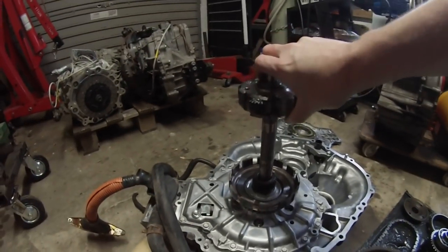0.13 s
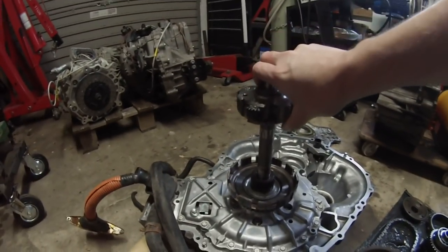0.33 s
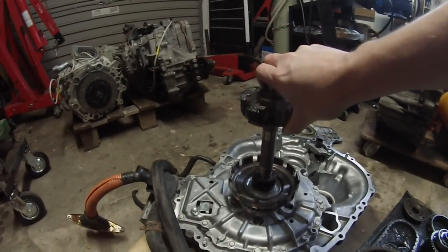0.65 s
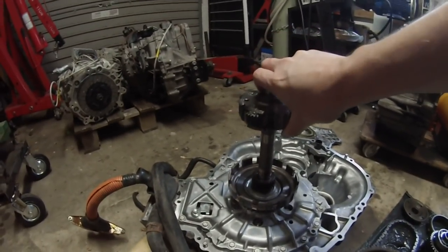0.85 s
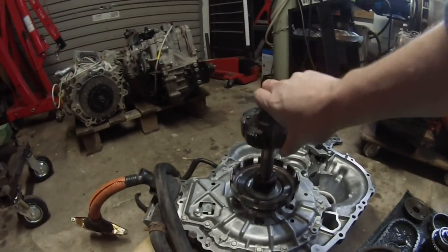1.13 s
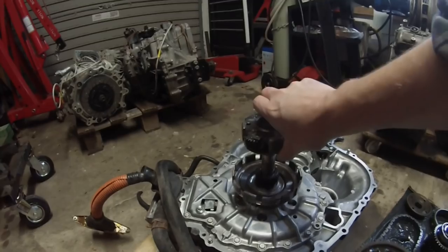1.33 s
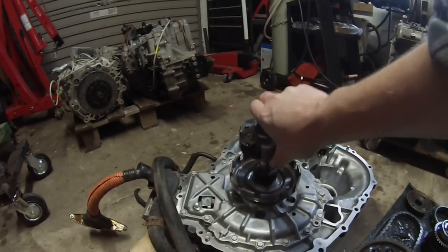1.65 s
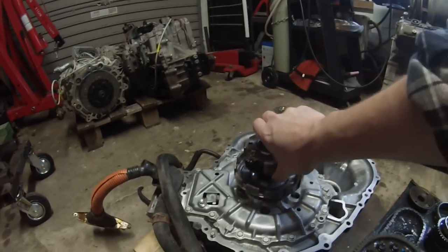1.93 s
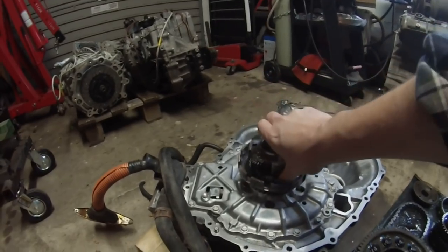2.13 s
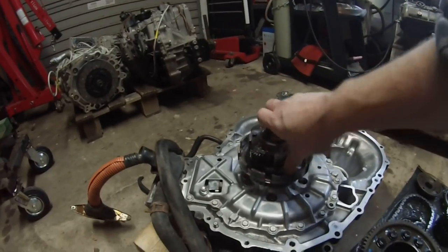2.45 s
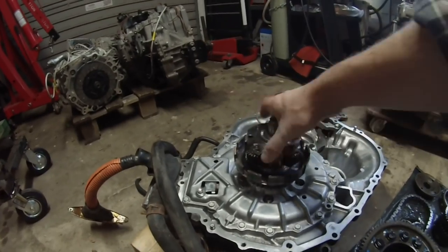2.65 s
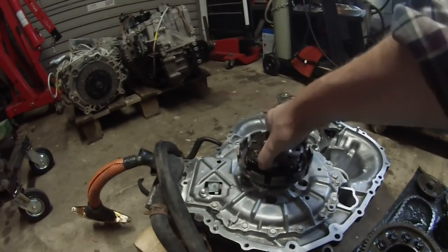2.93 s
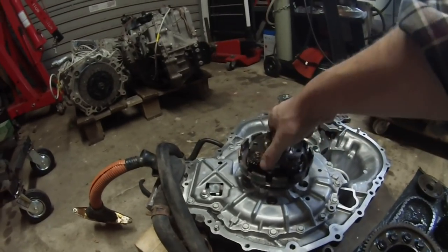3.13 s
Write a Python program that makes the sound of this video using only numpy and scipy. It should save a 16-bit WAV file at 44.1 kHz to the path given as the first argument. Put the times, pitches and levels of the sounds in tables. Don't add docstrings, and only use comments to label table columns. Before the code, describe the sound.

Heavy steel gear shaft clinks and knocks into a metal case, ending with two loud clacks

```python
import sys
import numpy as np
from scipy import signal
from scipy.fft import rfft, irfft
from scipy.io import wavfile
from scipy.ndimage import uniform_filter1d

SR = 44100
rng = np.random.default_rng(int(sys.argv[2]) if len(sys.argv) > 2 else 0)


def dump(signal):
    limited = np.clip(np.atleast_2d(signal).T, -1, 1)
    pcm = np.round(limited * 32767).astype(np.int16)
    wavfile.write(sys.argv[1], SR, pcm)


def invert_db(x):
    u = np.asarray(x, float) / 20
    return 10 ** u


N = 145530
LEAD_S = 0.5
LAYER_SIZE = N + 2 * SR
MODE_SPREAD_DB = 2


def at_hz(points, hz):
    table_hz, values = np.transpose(points)
    return np.interp(np.log(hz), np.log(table_hz), values)


def add(out, s, sound):
    i = int((s + LEAD_S) * SR)
    out[i:i + len(sound)] += sound


def smooth_rise(progress):
    return np.sin(np.pi / 2 * np.minimum(progress, 1)) ** 2


def rings(hz, db, t60, seconds=.6):
    t = np.arange(int(seconds * SR))[:, None] / SR
    signs = (-1.) ** np.arange(len(hz))
    return np.sum(signs * invert_db(db - 60 * t / t60) * np.sin(2 * np.pi * hz * t), axis=1)


def shaft():
    # t/s, level/dB, third mode/dB, lowest mode/dB, free ring re burst/dB
    clinks = [(0.1272, -41, -17, -0.5, -7.5), (.203, -63.5, -23, 4, 6), (.3167, -59.5, 7.5, -11, -24),
              (0.374, -63, 8.5, 15, -5), (0.395, -43, 1.5, 1, -7), (1.268, -33.5, -4, -8, -6.5),
              (1.2741, -33.5, 7.5, -12, -19), (1.603, -63, -15, -19, -14), (1.6317, -50, -4.5, -20, -17),
              (1.7834, -70, -9, -5, 0), (1.8122, -36.5, -16, 1, -12), (1.8462, -28.5, 0, -10, -40),
              (2.029, -51, -0.5, 11, -2), (2.588, -56, 1, -5, -23), (2.8159, -11.5, -20, -10, -31),
              (2.9725, -24, 3.5, -27, -1.5)]
    # f/Hz, level/dB, free ring T60/s
    bending_modes = [(1033, -2.5, 0.24), (2255, 5, 0.2), (3538, 0, 0.1), (4880, -3, 0.074),
                     (6150, 2.5, 0.065), (6960, -25, 0.056)]
    grip_t60_s, rise_s = 0.015, 0.0008
    seated_s, seated_t60_share, seated_top_db = 1.2, 0.3, 6.5
    out = np.zeros(LAYER_SIZE)
    hz, db, t60 = np.transpose(bending_modes)
    luck_db = rng.normal(0, 1, (len(clinks), len(hz)))
    for (s, level_db, third_db, low_db, ring_db), chance_db in zip(clinks, luck_db):
        seated = s > seated_s
        upper_db = -1.6 * abs(third_db) - seated_top_db * seated
        balance_db = np.r_[low_db, 0, third_db, np.full(len(hz) - 3, upper_db)]
        mode_db = level_db + db + balance_db + chance_db
        choked = rings(hz, mode_db, grip_t60_s)
        free = rings(hz * 1.002, mode_db + ring_db, t60 * (seated_t60_share if seated else 1))
        sound = choked + free
        add(out, s, sound * smooth_rise(np.arange(len(sound)) / (rise_s * SR)))
    return out


def singled():
    # t/s, f/Hz, level/dB, T60/s
    single_modes = [(.128, 1051, -52, 0.47), (.3175, 3500, -61, .03), (.3175, 6800, -54, .02),
                    (.396, 2248, -46.5, 0.22), (.396, 3610, -58, 0.26), (.396, 6160, -62, 0.25),
                    (.395, 2900, -52, 0.023), (.652, 518.4, -48, 0.17), (1.275, 2650, -30, 0.024),
                    (1.277, 926, -36, .1), (1.277, 299.2, -35, 0.32), (1.29, 62, -52, 0.61),
                    (1.3, 111, -47.5, 0.42), (1.783, 2030, -51, 0.088), (1.783, 3400, -59, .04),
                    (1.799, 2150, -47, 0.055), (1.81, 219, -38.5, 0.3), (1.81, 796, -41, 0.14),
                    (1.833, 1720, -49, .02), (1.846, 3540, -48, .2), (1.846, 3100, -45, 0.023),
                    (1.846, 6170, -39, 0.017), (2.028, 1730, -43, 0.016), (2.066, 2290, -54, .04),
                    (2.07, 530, -37.5, 0.36), (2.072, 815, -38, 0.12), (2.199, 780, -49, 0.12),
                    (2.224, 811.5, -25, 0.14), (2.224, 685, -41, 0.11), (2.227, 5930, -34, .015),
                    (2.816, 4850, -25, 0.015), (2.816, 6130, -29.5, .012), (2.82, 2277, -23, 0.096),
                    (2.822, 2095, -30, .12), (2.828, 5780, -30, 0.017), (2.828, 5200, -34, 0.017),
                    (2.972, 5710, -20, .012), (2.972, 3490, -17.5, 0.061), (2.975, 778, -19.5, 0.12),
                    (2.974, 1308, -17, .065), (2.974, 1680, -14, 0.066), (2.983, 960, -30, 0.023),
                    (3.0, 60, -52, 0.67)]
    swell_cycles = 3.3
    out = np.zeros(LAYER_SIZE)
    t = np.arange(int(.6 * SR)) / SR
    for s, hz, db, t60 in single_modes:
        decay = invert_db(db - 60 * t / t60)
        add(out, s, smooth_rise(t * hz / swell_cycles) * decay * np.sin(2 * np.pi * hz * t))
    return out


def case():
    # t/s, then level/dB of the deepest, deep, middle and upper mode families
    blows = [(-.03, -55, -57, -62, -72), (.128, -57, -55, -52, -57.5), (.201, -74, -61, -57, -60),
             (0.318, -57, -59, -56.5, -58), (0.374, -51.5, -56.5, -48.5, -53.5), (.435, -52, -58, -54, -55),
             (.652, -58, -49, -44, -45), (.686, -66, -56, -53, -55), (.772, -56, -57.5, -68, -58),
             (.971, -46, -51, -57, -60), (1.156, -66, -81, -76, -81), (1.2766, -31.5, -26.5, -55, -30),
             (1.62, -54, -60, -54, -49.5), (1.6436, -44.5, -59, -48.5, -39), (1.8097, -32, -40.5, -41, -38),
             (1.8212, -39, -41.5, -42, -36), (1.87, -40, -51, -41.5, -61), (2.0279, -38.5, -46, -37, -42),
             (2.0658, -44, -49, -45, -38), (2.105, -49.5, -70, -42.5, -48),
             (2.2237, -32.5, -36.5, -29, -24), (2.585, -58.5, -79, -62, -72),
             (2.819, -29, -28.5, -28.5, -27.5), (2.974, -26, -28, -35, -19.5)]
    # f/Hz, level/dB, T60/s, family [rounded: 0 deepest .. 3 upper
    low_modes = [(109.6, -16.5, 0.37, 0.5), (134.2, -12.5, 0.26, 0), (220.2, 1, 0.15, -0.5),
                 (255.2, 1, 0.1, 0.5), (305.1, -1, 0.22, 1), (415.6, 3.5, 0.04, 2), (64, -30, 0.54, -4),
                 (507.8, 1.5, 0.089, 2), (542, -1, 0.096, 2), (606, 0, 0.061, 2), (679, -10.5, 0.12, 3),
                 (766, 0.5, 0.042, 3), (815.5, -1, 0.087, 3), (948, -14.5, 0.05, 3)]
    swell_cycles = 2.21
    out = np.zeros(LAYER_SIZE)
    hz, db, t60, family = np.transpose(low_modes)
    family = np.round(family).astype(int)
    t = np.arange(int(.6 * SR))[:, None] / SR
    luck = rng.normal(0, 1, (len(blows), 2, len(hz)))
    for (s, *family_db), (chance, phase) in zip(blows, luck):
        mode_db = np.array(family_db)[family] + db + MODE_SPREAD_DB * chance
        decay = invert_db(mode_db - 60 * t / t60)
        waves = smooth_rise(t * hz / swell_cycles) * decay * np.sin(2 * np.pi * (hz * t + phase))
        add(out, s, np.sum(waves, axis=1))
    return out


def colour_db(hz, centre_hz, fall_db):
    rise_db, bend_db = 1.5, 0.37
    octaves = np.log2(hz / centre_hz)
    hump_db = np.where(octaves > 0, -fall_db * octaves - bend_db * octaves ** 2, rise_db * octaves)
    top_loss_db = 26.0 * np.maximum(np.log2(hz / 9500), 0)
    low_loss_db = 9.6 * np.maximum(np.log2(255 / hz), 0)
    return hump_db - top_loss_db - low_loss_db


def clatter():
    # t/s, level/dB, centre f/Hz, fall above centre/(dB per octave), T60/s
    contacts = [(-.03, -45.5, 1710, 9, 0.041), (.1276, -46.5, 2000, 9, 0.014),
                (.3167, -53.5, 6600, 22, 0.034), (.373, -49.5, 800, 9, 0.11),
                (.394, -47.5, 3080, 5.5, 0.07), (.652, -41.5, 850, 13, 0.045),
                (1.0186, -44, 1200, 34, 0.014), (1.267, -44, 3030, 20, 0.077),
                (1.2745, -22.5, 1000, 11, 0.074), (1.6317, -55, 2480, 14, 0.04),
                (1.6442, -37, 1600, 18, 0.017), (1.8095, -40.5, 1200, 11, 0.013),
                (1.8213, -30, 1610, 18, 0.0081), (1.8457, -41, 6000, 39, 0.019),
                (2.0278, -32.5, 1600, 28, 0.021), (2.0657, -48, 824, 7, 0.15),
                (2.2223, -18, 1200, 9, 0.033), (2.586, -51.5, 2000, 9, .03),
                (2.8158, -21, 2480, 7.5, 0.028), (2.972, -9, 1450, 8, 0.04)]
    # f/Hz, level/dB, T60/s
    rim_modes = [(1200, -5, 0.12), (1328, -8.5, 0.044), (1411, -3, 0.074), (1557, 7.5, 0.024),
                 (1695, 3.5, 0.038), (1856, 0.5, 0.087), (2046, 7, 0.04), (2545, -20, 0.047),
                 (3120, 5, 0.049), (3380, -30, 0.023)]
    rim_db, rim_delay_s, rim_rise_s = -9.5, 0.00053, 0.0041
    size = 6000
    out = np.zeros(LAYER_SIZE)
    hz, db, t60 = np.transpose(rim_modes)
    noise = rng.standard_normal((len(contacts), size))
    luck = rng.normal(0, 1, (len(contacts), len(hz)))
    t, bins_hz = np.arange(size) / SR, np.fft.rfftfreq(size, 1 / SR) + 1
    for k, (s, level_db, centre_hz, fall_db, decay_s) in enumerate(contacts):
        envelope = invert_db(-60 * t / decay_s) * np.minimum(t / 0.0006, 1)
        spectrum = rfft(noise[k] * envelope)
        spectrum = spectrum / np.sqrt(uniform_filter1d(np.abs(spectrum) ** 2, size=30))
        burst = irfft(spectrum * invert_db(colour_db(bins_hz, centre_hz, fall_db)), size)
        burst = burst * np.minimum(t / 0.00026, 1) * (t < .1)
        add(out, s, invert_db(level_db) * burst * envelope.std() / burst.std())
        mode_db = level_db + rim_db + db + colour_db(hz, centre_hz, fall_db) + MODE_SPREAD_DB * luck[k]
        rim = rings(hz, mode_db, t60, seconds=.2)
        add(out, s + rim_delay_s, rim * np.minimum(np.arange(len(rim)) / (rim_rise_s * SR), 1))
    return out


def scrape():
    # start t/s, length/s, level/dB
    slides = [
        (1.06, 0.047, -64),
        (1.167, 0.1, -62),
        (1.622, 0.11, -68.5),
        (1.777, 0.105, -61),
        (2.195, 0.026, -60.5),
    ]
    # f/Hz, level/dB
    friction_colour = [(700, -7), (2200, -3.5), (6000, -8.5), (14000, -20.5)]
    grains_per_s, attack_s, release_s = 5900, 0.016, 0.0064
    slips = rng.random(N) < grains_per_s / SR
    grains = slips * rng.standard_normal(N) * invert_db(2.0 * rng.exponential(1, N))
    hz = np.fft.rfftfreq(N, 1 / SR) + 1
    grains = irfft(rfft(grains) * invert_db(at_hz(friction_colour, hz)) * (hz > 300), N)
    t, envelope = np.arange(N) / SR, 0
    for s, length, db in slides:
        ramps = np.minimum((t - s) / attack_s, (s + length - t) / release_s)
        envelope = envelope + invert_db(db) * np.clip(ramps, 0, 1)
    lead = SR // 2
    return np.r_[np.zeros(lead), envelope * grains / grains.std(), np.zeros(2 * SR - lead)]


def scatter(x):
    level_db, t60_s, low_hz = -14.5, 0.0056, 900
    taps = rng.standard_normal(400) * invert_db(-60 * np.arange(400) / SR / t60_s)
    taps = taps / np.sqrt(np.sum(taps ** 2))
    x = signal.sosfilt(signal.butter(1, low_hz, "high", fs=SR, output="sos"), x)
    return invert_db(level_db) * signal.fftconvolve(x, taps)[:len(x)] * np.array([[1], [-1]])


def bands(length):
    edges = 20 * 2 ** np.arange(0, 10, .5)
    settle = 4000
    white = rng.standard_normal((2, 2, length + settle))
    for k, (low, high) in enumerate(zip(edges, edges[1:])):
        band = signal.butter(2, [low, high], "band", fs=SR, output="sos")
        yield np.sqrt(low * high), signal.sosfilt(band, white[k % 2])[:, settle:]


def stereo(pair, alike):
    alike = np.clip(alike, 0, 1)
    return np.sqrt(1 + alike) * pair[0] + np.sqrt(1 - alike) * pair[1] * np.array([[1], [-1]])


def garage(x):
    # f/Hz, T60/s
    reverb_t60 = [(80, 0.79), (300, 0.46), (1500, 0.41), (5000, 0.38), (12000, 0.25)]
    # f/Hz, level/dB
    tail_db = [(80, -13), (400, -5), (2000, -8.5), (10000, -8)]
    # f/Hz, likeness/1
    tail_alike = [(60, 0.81), (300, 1), (1500, 0.76), (6000, 0.053)]
    first_wall_s, build_s, near_echo, near_decay_s = 0.0052, 0.0074, 0.8, 0.013
    t, tail = np.arange(int(.7 * SR)) / SR, 0
    for hz, pair in bands(len(t)):
        t60 = at_hz(reverb_t60, hz)
        decay = invert_db(at_hz(tail_db, hz) - 60 * t / t60) / np.sqrt(t60 * SR / 14)
        tail = tail + stereo(pair, at_hz(tail_alike, hz)) * decay
    build = np.clip((t - first_wall_s) / build_s, 0, 1)
    tail = tail * build * (1 + near_echo * np.exp(-t / near_decay_s))
    return signal.fftconvolve(x[None], tail, axes=1)[:, :len(x)]


def hiss():
    # f/Hz, level/dB
    noise_colour = [(25, 4), (60, 1.5), (110, 4.5), (222, -2), (500, -2.5), (4420, -13), (11800, -19),
                    (15500, 1)]
    # f/Hz, likeness/1
    noise_alike = [(30, 0.77), (200, 0.55), (2000, 0.25), (12000, 0.089)]
    level_db, top_hz = -60, 15900
    out = 0
    for hz, pair in bands(N):
        out = out + stereo(pair, at_hz(noise_alike, hz)) * invert_db(at_hz(noise_colour, hz))
    out = signal.sosfilt(signal.cheby2(8, 40, top_hz, fs=SR, output="sos"), out)
    return invert_db(level_db) * out / out.std()


def scene():
    pan_db, port_lag_s, shaft_wet_db = 0.7, 1.2e-5, -4
    steep = signal.butter(3, 70, "high", fs=SR, output="sos")
    bar, body = signal.sosfilt(steep, [shaft(), case() + clatter() + scrape()])
    bar = bar + singled()
    parts = bar + body
    hz = np.fft.rfftfreq(len(parts), 1 / SR)
    lagged = irfft(rfft(parts) * np.exp(-2j * np.pi * port_lag_s * hz), len(parts))
    near = np.array([invert_db(pan_db) * parts, lagged])
    far = garage(body + invert_db(shaft_wet_db) * bar)
    lead = SR // 2
    return (near + far + scatter(parts))[:, lead:lead + N] + hiss()


def top_cut(x):
    return signal.sosfilt(signal.butter(12, 16470, fs=SR, output="sos"), x)


def record(dry):
    headroom, low_hz, top_hz = 0.8, 40.3, 16900
    rounded = headroom * np.tanh(dry / headroom)
    mic = signal.sosfilt(signal.butter(2, low_hz, "high", fs=SR, output="sos"), rounded)
    mic = signal.sosfilt(signal.cheby2(8, 30, top_hz, fs=SR, output="sos"), mic)
    return top_cut(mic)


dry = scene()
out = record(dry)
dump(out)
```